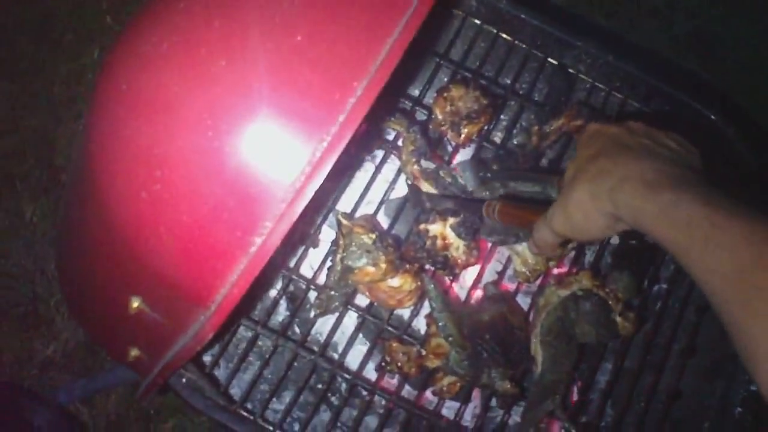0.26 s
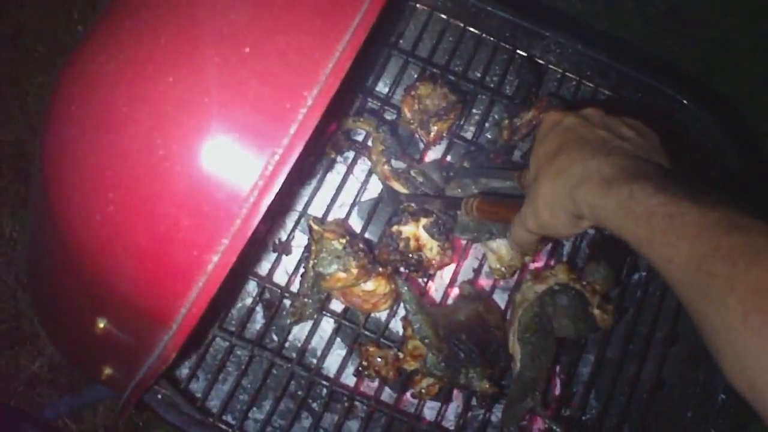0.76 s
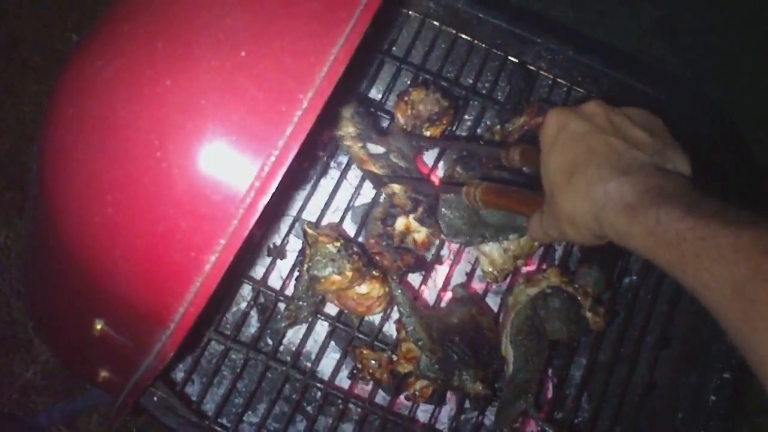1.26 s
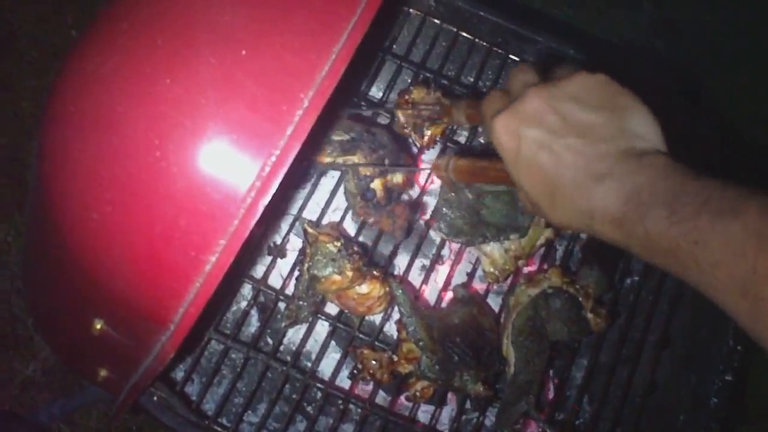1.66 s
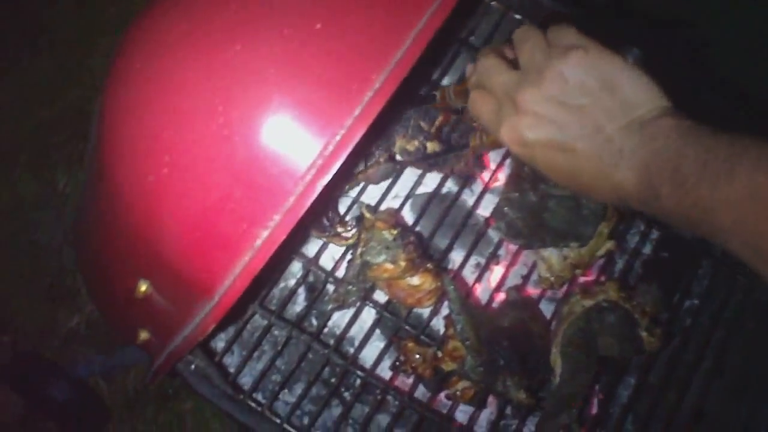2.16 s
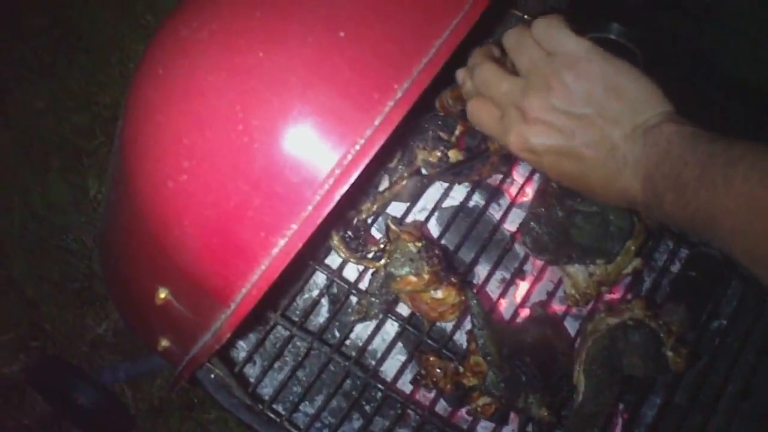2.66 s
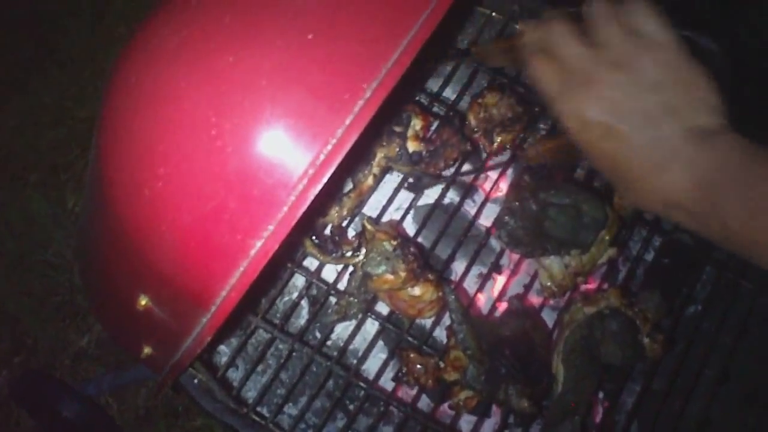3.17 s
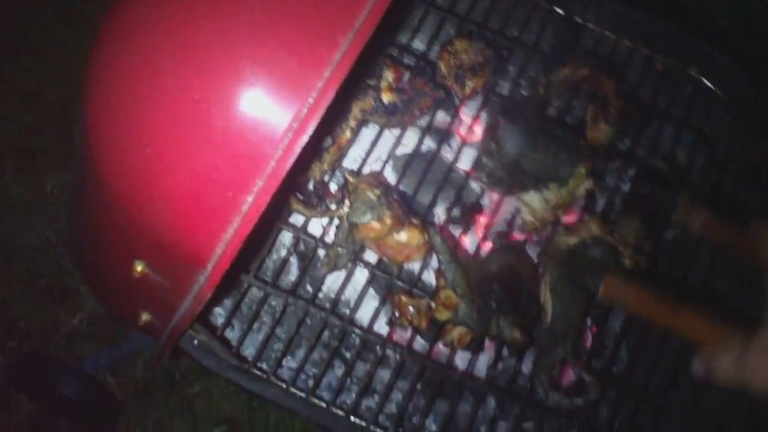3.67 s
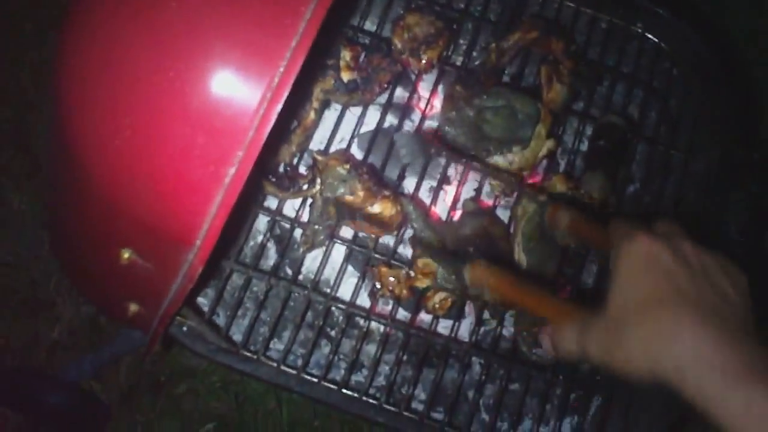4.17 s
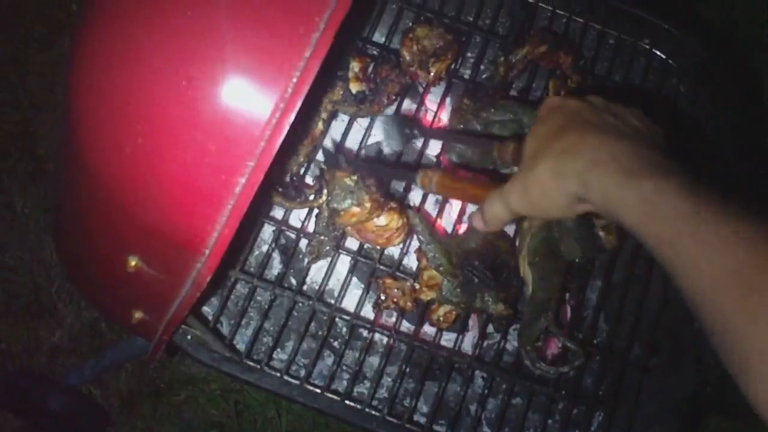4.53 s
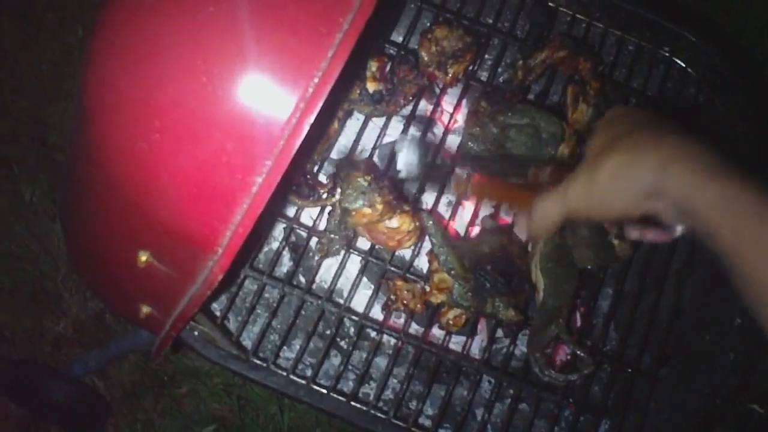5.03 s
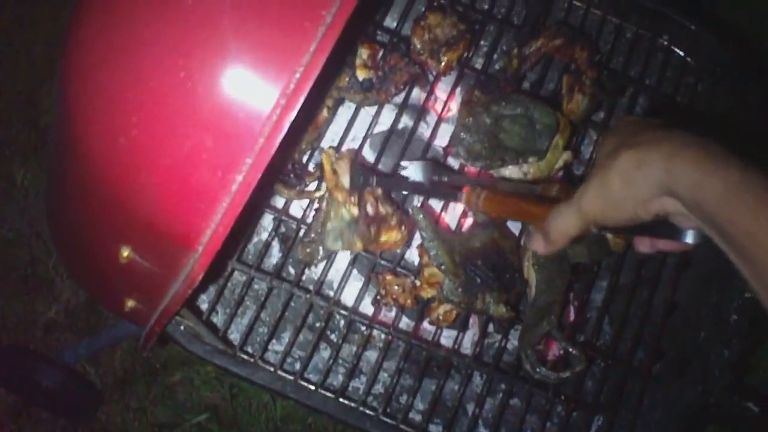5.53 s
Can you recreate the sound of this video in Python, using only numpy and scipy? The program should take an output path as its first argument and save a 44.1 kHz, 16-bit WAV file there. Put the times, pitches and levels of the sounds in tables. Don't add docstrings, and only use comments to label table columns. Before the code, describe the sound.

Dense frying fizz and crackling fat on a grill, with a faint tong knock midway, a compressor humming nearby and a cricket chirping at night.

```python
import sys
import numpy as np
from scipy import signal
from scipy.fft import rfft, irfft
from scipy.io import wavfile

SR = 44100
rng = np.random.default_rng(int(sys.argv[2]) if len(sys.argv) > 2 else 0)


def output_pcm(signal):
    pcm = np.clip(np.atleast_2d(signal).T, -1, 1) * 32767
    wavfile.write(sys.argv[1], SR, np.round(pcm).astype(np.int16))


def how_loud(loudness_db):
    steps = np.asarray(loudness_db, float) / 20
    return 10 ** steps


N = 255780

# freq_hz, density_db
FAN_SPECTRUM = [(12, -55), (20, -29), (108, -15), (184, -15), (407, -11.5), (721, -6.5), (814, -6),
                (883, -5.5), (939, -6), (1020, -4), (1500, -8), (1840, -10), (2600, -20), (3380, -46),
                (5720, -120)]
# shaft_multiple, rms_db
MOTOR_TONES = [(2, -72), (3, -81.5), (4, -68.5), (5, -71.5), (6, -71.5), (8, -72), (10, -71.5), (11, -65),
               (12, -70.5), (13, -71), (14, -57.5), (15, -63.5), (16, -51), (18, -67), (19, -63), (20, -65),
               (21, -60), (27, -74), (28, -70.5), (29, -64.5), (32, -65), (37, -64.5)]
# start_s, peak_db
GRATE_NUDGES = [
    (2.888, -34.5),
    (2.902, -27),
]
# start_s, peak_db, middle_re_peak_db, ring_hz
FAT_POPS = [(0.0563, -20, -15, 5800), (0.1236, -25, -16, 6740), (0.5262, -25, -15, 5740),
            (0.6015, -26, -20, 5680), (0.8101, -19, -12, 5840), (1.1573, -26, -17, 5800),
            (1.4326, -26, -14, 5580), (1.4965, -22, -15, 6570), (1.5733, -21, -17, 5880),
            (1.5978, -15, -17, 5740), (1.6197, -18, -14, 6680), (1.6322, -20, -10, 5810),
            (1.6901, -23, -12, 5870), (1.9654, -26, -14, 5780), (2.2408, -20, -18, 6630),
            (2.2603, -24, -17, 6600), (2.3301, -20, -18, 6770), (2.4962, -23, -15, 6150),
            (2.5391, -25, -17, 5510), (2.9073, -22, -14, 5620), (3.0315, -25, -14, 5840),
            (3.1014, -21, -18, 6020), (3.24, -20, -14, 6590), (3.457, -23, -15, 5670),
            (3.7319, -26, -17, 5650), (4.4468, -27, -10, 5930), (4.8978, -27, -18, 6760),
            (4.9157, -28, -15, 5650), (4.9352, -21, -20, 6750), (4.9691, -20, -21, 5890)]
# time_s, fizz_db
FRY_VIGOUR = [(0.0, -44), (0.2, -43), (0.5, -45), (1.05, -45.5), (1.2, -43.5), (1.52, -42), (1.6, -39),
              (1.76, -45), (2.37, -43.5), (2.85, -47.5), (3.1, -43), (3.25, -45), (3.45, -44.5),
              (3.75, -47.5), (4.75, -48.5), (5.06, -47), (5.5, -45), (5.8, -47.5)]
# freq_hz, density_db
FIZZ_SPECTRUM = [(2500, -40), (4000, -15), (4900, -11.5), (5200, -10), (5550, -2), (5950, -1), (6300, -3.5),
                 (6750, -2.5), (7000, -5), (7250, -11.5), (7500, -19), (7900, -37), (8400, -42),
                 (11000, -90)]
# freq_hz, density_db
CRACKLE_SPECTRUM = [(880, -28), (1500, -3), (1950, 3.5), (2760, -1.5), (3080, 2.5), (3700, -7.5),
                    (5000, -8), (6500, -26.5), (11000, -120)]
MIC_RING_HZ = (5750, 6650)
# freq_hz, step_db
LINE_STEPS = [(20, -70), (1200, -47), (2300, -34), (3200, -34), (4000, -35.5), (5100, -33.5), (5400, -34),
              (7100, -35), (8300, -27)]

MOTOR_HZ, MOTOR_WAVER_DB = 59.106, 1.5
FAN_DB, FAN_WAVER_DB = -46, 0.03
CRICKET_HZ, CRICKET_DB, CRICKET_START_S = 6755, -47, 0.045
CHIRP_S, SYLLABLE_S = 0.387, 0.042
POP_GAIN_DB, MIDDLE_GAIN_DB, KNOCK_DB = -0.3, 13, -16
SMALL_COUNT = 90
SMALL_OVER_DB, SMALL_SPREAD_DB, SMALL_MIDDLE_DB = 10, 1.23, -11.5
BURSTS_PER_S, PUFF_T60_S = 2600, 0.005
FIZZ_DB = 0.84
CRACKLE_DB, CRACKLE_FOLLOWS = -49.5, 0.78
HOP, LINES_KEPT = 794, 300


def rms_one(x):
    return x / np.sqrt(np.mean(x ** 2) + 1e-20)


def decay(t_s, t60_s):
    return how_loud(-60 * t_s / t60_s)


def drift(rate_hz):
    pole = np.exp(-80 * np.pi * rate_hz / SR)
    noise = rng.standard_normal(N // 40 + 2002)
    slow = signal.lfilter([1], [1, -2 * pole, pole * pole], noise)[2000:]
    return np.interp(np.arange(N) / 40, np.arange(len(slow)), rms_one(slow))


def colour(x, spectrum):
    freq_hz, level_db = np.transpose(spectrum)
    log_bins = np.log(np.arange(2049) * SR / 4096 + 1)
    log_gain = np.interp(log_bins, np.log(freq_hz), level_db) * np.log(10) / 20
    cepstrum = irfft(log_gain)
    cepstrum[1:2048] *= 2
    cepstrum[2049:] = 0
    impulse = irfft(np.exp(rfft(cepstrum)))
    return rms_one(signal.fftconvolve(x, impulse)[:N])


def band(x, low_hz, high_hz):
    return signal.sosfilt(signal.butter(2, [low_hz, high_hz], "band", fs=SR, output="sos"), x)


def vigour():
    time_s, fizz_db = np.transpose(FRY_VIGOUR)
    return np.interp(np.arange(N) / SR, time_s, fizz_db)


def compressor():
    shaft_phase = 2 * np.pi * MOTOR_HZ * np.arange(N) / SR
    tones = np.zeros(N)
    for multiple, rms_db in MOTOR_TONES:
        start_phase = rng.uniform(0, 2 * np.pi)
        level = how_loud(rms_db + MOTOR_WAVER_DB * drift(7.0))
        tones += level * np.sin(multiple * shaft_phase + start_phase)
    air = colour(rng.standard_normal(N), FAN_SPECTRUM)
    return np.sqrt(2) * tones + how_loud(FAN_DB + FAN_WAVER_DB * drift(0.93)) * air


def cricket():
    t = np.arange(N) / SR
    in_chirp = (t - CRICKET_START_S) % CHIRP_S / SYLLABLE_S
    syllables = np.sin(np.pi * in_chirp) ** 2 * (in_chirp < 3)
    phase = 2 * np.pi * np.cumsum(CRICKET_HZ + 15 * drift(30)) / SR
    return how_loud(CRICKET_DB + 1.5 * drift(4)) * syllables * np.sin(phase)


def nudges():
    out, t = np.zeros(N), np.arange(1500) / SR
    upper_mode = np.sin(2 * np.pi * 950 * t) * decay(t, 0.0038)
    lower_mode = 0.36 * np.sin(2 * np.pi * 560 * t) * decay(t, 0.023)
    for start_s, peak_db in GRATE_NUDGES:
        at = round(start_s * SR)
        out[at:at + 1500] += how_loud(peak_db - 1.5) * (upper_mode + lower_mode)
    return out


def small_spits():
    when, size, middle, ring = rng.random((SMALL_COUNT, 4)).T
    start_s = when * (N - 1) / SR
    local_db = vigour()[(start_s * SR).astype(int)]
    peak_db = local_db + SMALL_OVER_DB - SMALL_SPREAD_DB * np.log(size + 0.14)
    middle_db = SMALL_MIDDLE_DB + 6 * (middle - 0.5)
    ring_hz = np.where(ring < 0.65, *MIC_RING_HZ)
    return list(zip(start_s, peak_db, middle_db, ring_hz))


def pops():
    out, t = np.zeros(N + 2000), np.arange(900) / SR
    for start_s, peak_db, middle_db, ring_hz in list(FAT_POPS) + small_spits():
        tails = rng.standard_normal((3, 900)) * decay(t, 0.013)
        tails[:, 0] = 5
        bright, middle, low = tails
        parts = [(band(bright, ring_hz * 0.84, min(ring_hz * 1.14, 7400)), 0),
                 (band(bright, 3200, 7200), -6),
                 (band(middle, 1700, 3700), middle_db + MIDDLE_GAIN_DB),
                 (band(low, 600, 1500), KNOCK_DB)]
        pop = sum(how_loud(level_db) * part / np.abs(part).max() for part, level_db in parts)
        standing_out = np.sqrt(max(1 - how_loud(2 * (-37 - peak_db)), 0.15))
        at = round(start_s * SR) + 25
        out[at:at + 900] += how_loud(peak_db + POP_GAIN_DB) * standing_out * pop / np.abs(pop).max()
    return out[:N]


def frying():
    vigour_db = vigour()
    born = rng.random(N) < BURSTS_PER_S * how_loud(1.6 * drift(30)) / SR
    sizes = born * how_loud(4.6 * np.minimum(rng.exponential(1, N), 4.0))
    puffs = rms_one(signal.lfilter([1], [1, -decay(1 / SR, PUFF_T60_S)], sizes))
    fizz_noise, crackle_noise = rng.standard_normal((2, N))
    fizz = colour(fizz_noise * (0.82 + puffs) * how_loud(0.7 * drift(12)), FIZZ_SPECTRUM)
    crackle = colour(crackle_noise * (1.2 + puffs) * how_loud(0.91 * drift(8.2)), CRACKLE_SPECTRUM)
    crackle_db = CRACKLE_DB + CRACKLE_FOLLOWS * (vigour_db - vigour_db.mean())
    return how_loud(vigour_db + FIZZ_DB) * fizz + how_loud(crackle_db) * crackle


def scene():
    mono = compressor() + cricket() + nudges() + pops() + frying()
    return np.array([mono, mono])


def round_lines(x):
    n, k = np.arange(2 * HOP), np.arange(LINES_KEPT)[:, None]
    window = np.sin(np.pi * (n + 0.5) / (2 * HOP))
    cosines = np.cos(np.pi / HOP * (n + 0.5 + HOP / 2) * (k + 0.5))
    basis = window * cosines * np.sqrt(2 / HOP)
    halves = np.pad(x, (HOP, 2 * HOP - N % HOP)).reshape(-1, HOP)
    frames = np.hstack([halves[:-1], halves[1:]])
    lines = frames @ basis.T
    freq_hz, level_db = np.transpose(LINE_STEPS)
    step_db = np.interp(np.log((k.T + 0.5) * SR / 2 / HOP), np.log(freq_hz), level_db)
    treble = lines[:, 80:].std(axis=1, keepdims=True)
    middle = lines[:, 90:185].std(axis=1, keepdims=True)
    loudness = treble ** 0.4 * middle ** 0.6
    loudness /= np.median(loudness)
    step = how_loud(step_db - 1 + rng.standard_normal((len(frames), 1))) * loudness
    has_snap = np.abs(frames).max(axis=1) > 4.4 * frames.std(axis=1)
    step[has_snap, :275] *= how_loud(-35)
    rounded = np.sign(lines) * np.floor((np.abs(lines) / step) ** 0.75 + 0.41) ** (4 / 3) * step
    back = rounded @ basis
    return (back[:-1, HOP:] + back[1:, :HOP]).ravel()[:N]


def top_cut(x):
    return signal.sosfilt(signal.butter(12, 8230, fs=SR, output="sos"), x)


def record(dry):
    limited = signal.sosfilt(signal.cheby2(12, 40, 8150, fs=SR, output="sos"), dry[0])
    mono = round_lines(limited) + how_loud(-100) * rng.standard_normal(N)
    return top_cut(np.array([mono, mono]))


dry = scene()
out = record(dry)
output_pcm(out)
```